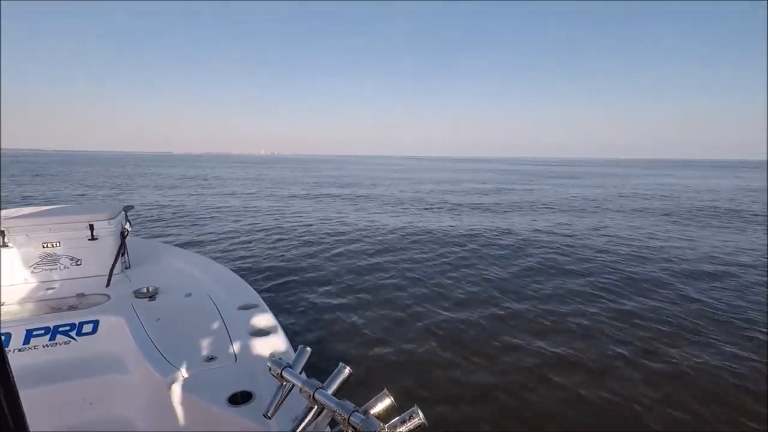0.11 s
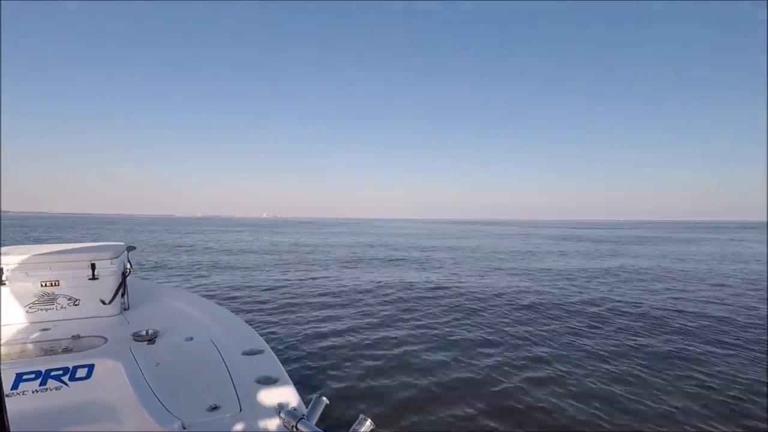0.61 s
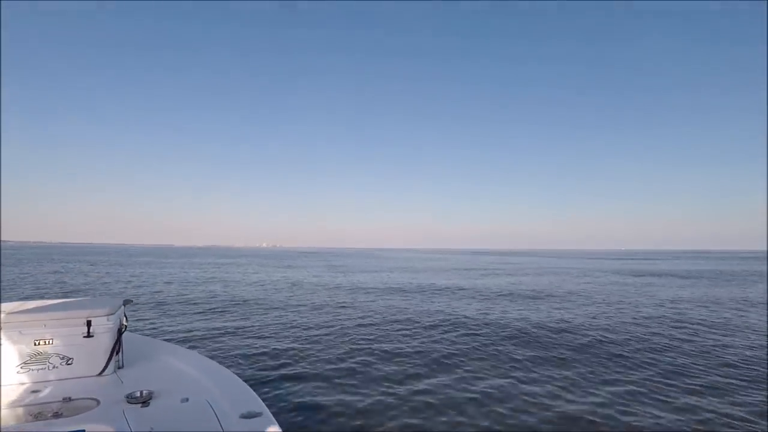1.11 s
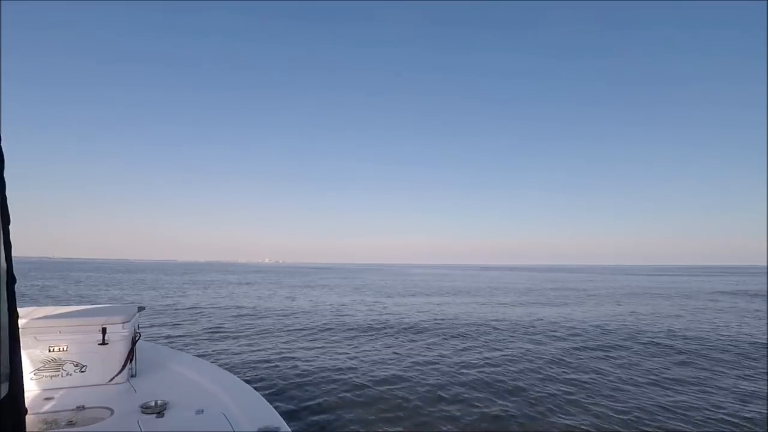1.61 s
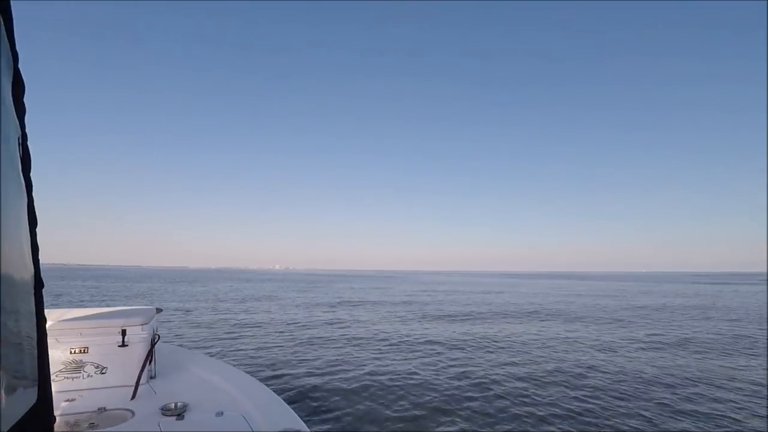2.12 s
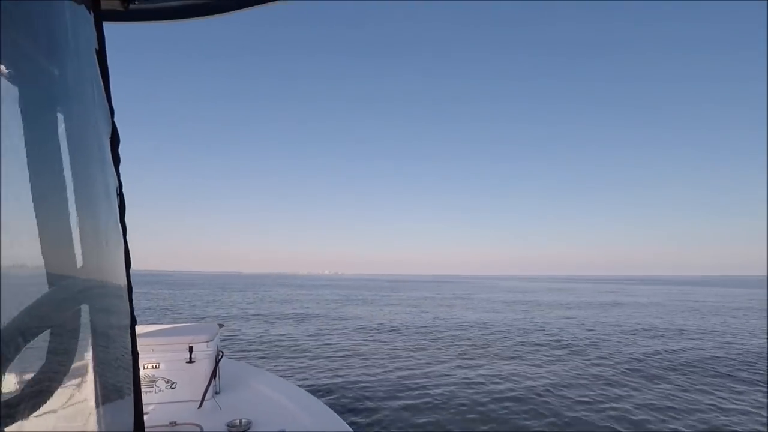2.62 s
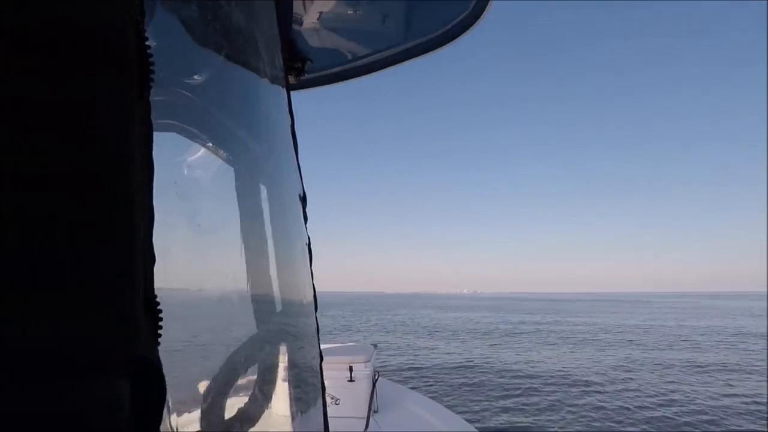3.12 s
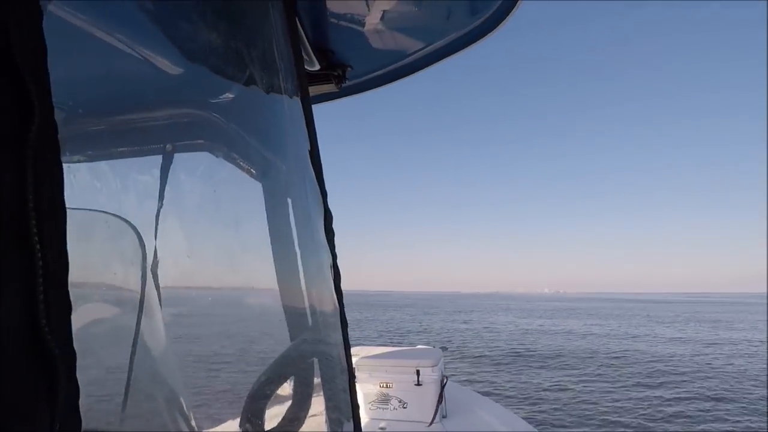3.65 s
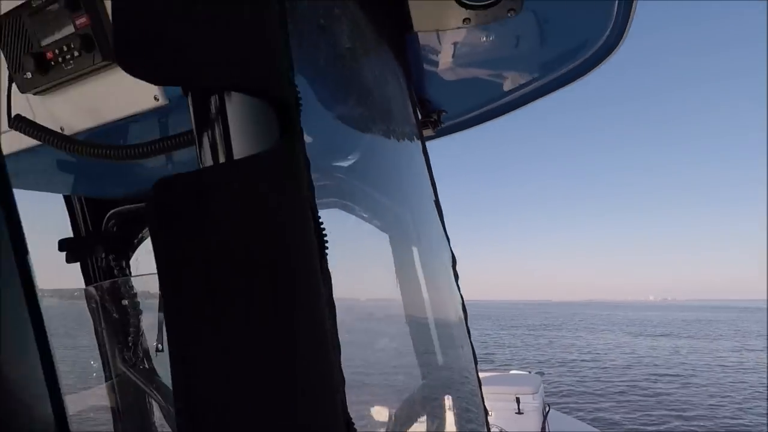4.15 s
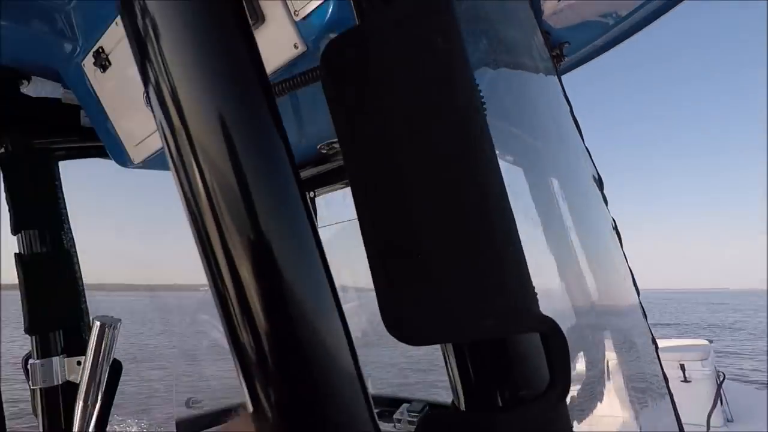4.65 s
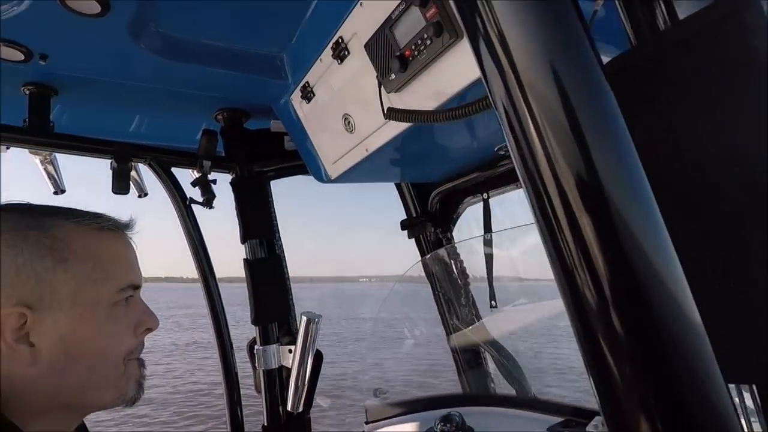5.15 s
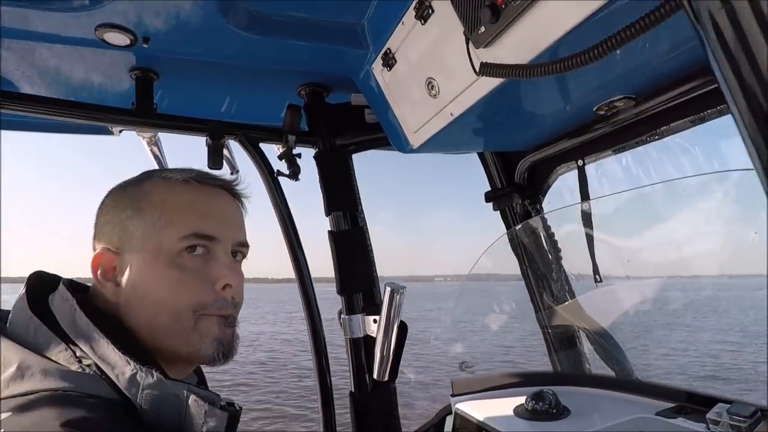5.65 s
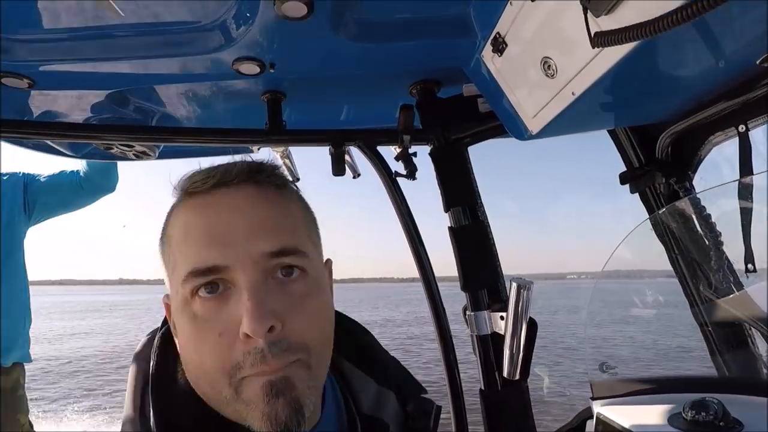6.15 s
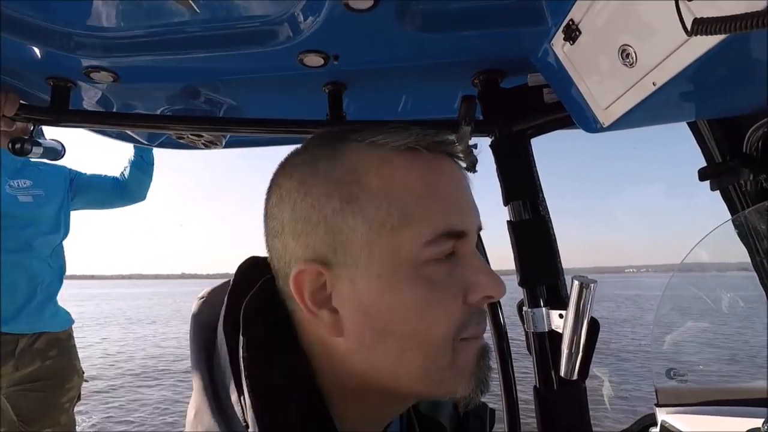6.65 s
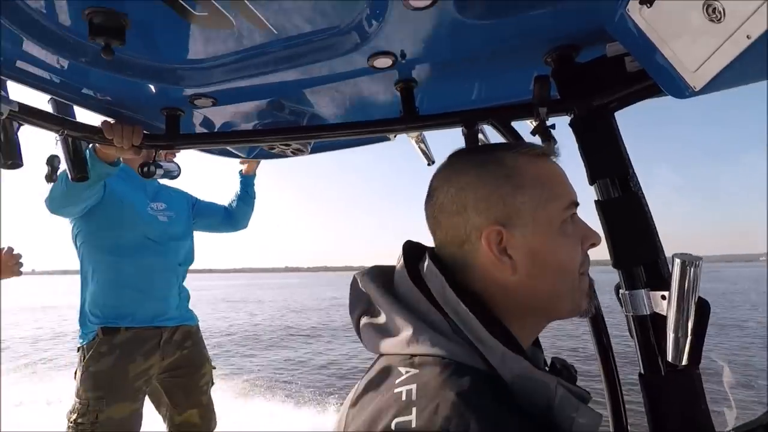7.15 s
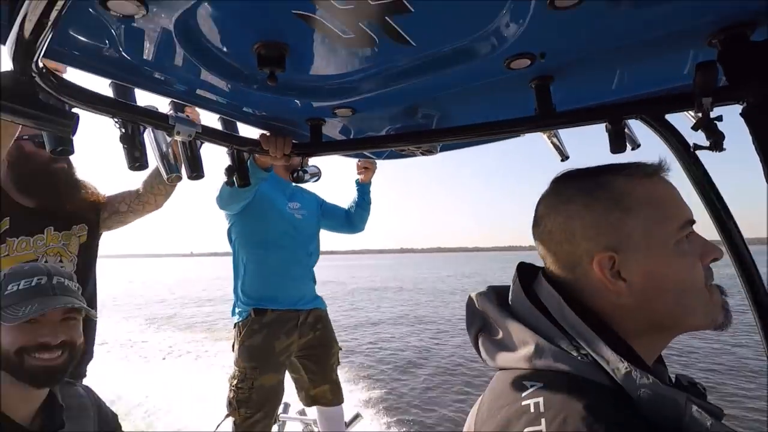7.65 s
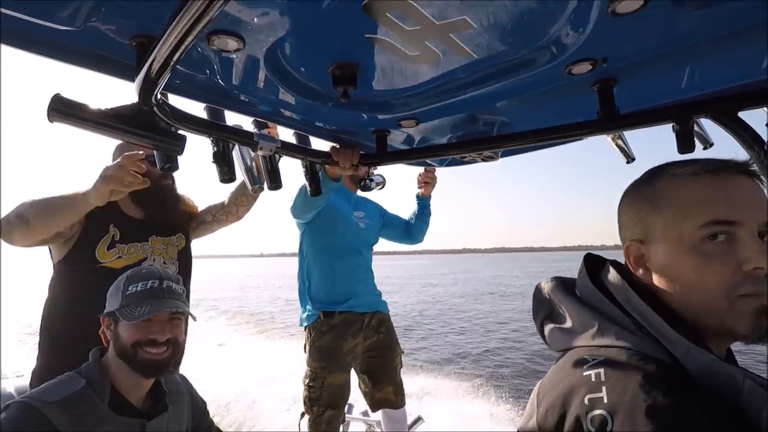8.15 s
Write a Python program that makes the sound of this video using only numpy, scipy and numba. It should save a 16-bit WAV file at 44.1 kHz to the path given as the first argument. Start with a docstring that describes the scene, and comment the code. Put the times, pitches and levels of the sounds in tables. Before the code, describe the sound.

Outdoors on a speeding boat, an exposed microphone catches deep wind throb throughout. Early on, bright spray rises and falls over a steady outboard drone and a pulsing hull hum, with a few tiny chirping drops. Around the middle come abrupt wind slaps and short gaps, then a hard fluttering gust, settling into thick low rumble with little spray left.

```python
"""Wind and spray on a fast motor boat

A small camera pans from the bow to the stern of a motor boat running fast over open water.
Wind is resonant and shaped noise that buffets the microphone port; damped swings thump as it turns past
the windscreen edge. Spray is shaped noise hissing along the hull, with chirping drops close by; an outboard
engine drones underneath as a sum of tones, the hull hums early on, and gain control rides the gusts."""
import sys
import numpy as np
from scipy import signal
from scipy.fft import rfft, irfft, next_fast_len
from scipy.io import wavfile
from scipy.ndimage import uniform_filter1d
from numba import njit

SR = 44100
rng = np.random.default_rng(int(sys.argv[2]) if len(sys.argv) > 2 else 0)


def voltage_ratio(level):
    """Linear amplitude factor for a level in decibels (scalar or array-like)."""
    return 10 ** (np.asarray(level, float) / 20)


def transcribe(u):
    """Save the signal u as a 16-bit wav file named by the first command-line argument.

    u: samples, shape (n,) or (channels, n), limited to [-1, 1]; the rate is SR.
    q: integer samples, one column per channel.
    """
    v = np.clip(np.atleast_2d(u).T, -1, 1)
    q = np.round(v * 32767).astype(np.int16)
    wavfile.write(sys.argv[1], SR, q)


N = 364707  # length in samples

# Source levels below are those ahead of the gain control.
# Drone as the camera turns. Each row: time in seconds, level in dB.
DRONE_LEVEL = [(0, -25), (1.5, -20.5), (2.3, -19), (3.5, -26), (4.2, -28.5), (5, -38), (8.27, -32)]
# Partials of the drone as ratios to the shaft frequency; 5.23 is the octave of the hull hum,
# the others are engine orders.
DRONE_RATIOS = [4, 5.23, 6, 7, 8, 9, 11, 13, 15, 16, 17, 25]
# Relative level in dB of each of those partials.
PARTIAL_LEVELS = [0, -2.5, -4.5, -0.5, -6, -5.5, -13.5, -17.5, -20.5, -24.5, -28.5, -30.5]
# Low hum of the hull. Each row: time in seconds, level in dB.
HULL_HUM = [(0.0, -17), (0.4, -18), (0.75, -11.5), (1.0, -15), (1.2, -23.5), (1.45, -12), (1.75, -13),
            (1.95, -24.5), (2.6, -24.5), (3.0, -45.5)]
# Drops of spray landing close by. Each row: start in seconds, level in dB, start pitch in Hz,
# end pitch in Hz, length in seconds.
SPRAY_DROPS = [(2.233, -35, 4140, 4650, 0.0051), (2.247, -30.5, 4030, 6440, 0.046),
               (2.737, -39, 4400, 5140, 0.0056), (3.139, -28.5, 4500, 6500, 0.0049)]
# Spray swells with each wave, then fades as the camera turns inboard. Each row: time in seconds,
# hiss level in dB, wash level in dB, splash against hiss in dB.
SPRAY_SWELL = [(0.0, -39.5, -39.5, -9), (0.15, -38.5, -41.5, -4), (0.46, -30.5, -34.5, -6.5),
               (0.7, -28, -36, -8), (0.93, -32, -41, -7), (1.23, -36.5, -43, -6.5),
               (1.62, -29, -37.5, -8.5), (1.98, -31, -41, -8.5), (2.17, -35, -44.5, -8),
               (2.37, -33.5, -42, -8), (2.5, -38.5, -45, -5), (2.87, -35.5, -41.5, -9),
               (3.17, -46, -49, -7.5), (3.7, -42, -42.5, -6.5), (4.3, -45, -40, -6),
               (4.73, -49.5, -47, -8.5), (5.0, -47.5, -44, -17), (5.35, -47.5, -46, -5.5),
               (6.6, -51, -50, -4.5), (8.27, -49.5, -47, -2)]
# The top treble of the spray is stronger mid-turn. Each row: time in seconds, change in dB.
FIZZ_CHANGE = [(2.5, -2), (3.2, 0), (4.0, 0), (4.5, -1), (8.27, -1)]
# Spectra of the four spray ranges. Each row: frequency in Hz, relative level in dB.
WASH_SPECTRUM = [(1050, -22), (1200, 3.5), (1400, 5), (1700, 2), (2700, -3.5), (3300, -6), (4200, -14.5)]
SPLASH_SPECTRUM = [(2600, -20.5), (3300, -6.5), (3900, 0), (4800, -1), (5800, -17)]
HISS_SPECTRUM = [(4200, -26.5), (5200, -4), (6900, 1), (8400, -5), (9500, -17.5), (10800, -24),
                 (12000, -46.5)]
FIZZ_SPECTRUM = [(6180, -53.5), (10500, -17), (11100, 0), (12500, 8), (14600, 0), (15100, -1)]
# Single eddies slapping the port. Each row: start in seconds, swing level in dB, pitch in Hz,
# crack level in dB, length of the swing in cycles.
EDDY_THUMPS = [(2.903, -2, 206, -43.5, 0.45), (2.915, -6, 193, -49, 0.53), (2.963, 0, 159, -43, 0.67),
               (3.075, -4, 230, -58, 0.52), (3.106, -1, 147, -54, .4), (3.131, -5, 286, -47, 1.03),
               (3.24, -4, 200, -55, 0.81), (3.747, -8.5, 228, -47, 0.7), (3.918, -4, 298, -35.5, 1.03),
               (3.99, -1, 147, -55, 0.43), (4.247, 5.5, 277, -38.5, 0.7), (4.27, 2, 228, -36, 0.94),
               (4.328, 4, 195, -33, 0.42), (4.341, -0.5, 205, -35.5, 0.65), (4.396, 5.5, 184, -35.5, 0.7),
               (4.433, 5.5, 282, -44.5, 0.64), (4.46, -1.5, 301, -39, 1.16), (4.698, -2.5, 222, -41, 0.47)]
# The level of the wind dips briefly. Each row: centre in seconds, length in seconds, depth in dB.
LEVEL_DIPS = [(0.102, .05, -0.5), (2.704, 0.054, -11), (3.005, 0.054, -21), (3.803, 0.035, -8),
              (3.968, .03, -19), (4.044, 0.066, -8), (5.858, 0.038, -6.5), (6.047, .07, -6.5),
              (6.507, 0.016, -17), (8.085, 0.11, -5.5)]
# Wind on the port as the camera turns. Each row: time in seconds, slow heave in dB, buffet in dB,
# buffet centre in Hz, flutter in dB, rasp in dB.
WIND_COURSE = [(0.0, -17, -18.5, 97, -19.5, -48), (0.45, -14, -17.5, 95.3, -22, -37),
               (1.1, -13.5, -18, 99.8, -19, -45), (1.6, -16, -15, 97, -18, -39.5),
               (2.3, -11, -15.5, 93.4, -23, -47.5), (2.85, -10.5, -13.5, 89, -20, -43),
               (3.15, -10.5, -22.5, 87, -34.5, -51), (3.7, -10, -16.5, 74.6, -22, -44.5),
               (4.1, -6, -21.5, 83.7, -29, -48), (4.35, -11.5, -13, 98.7, -19.5, -34.5),
               (4.65, -11, -17.5, 92.4, -23, -46.5), (4.95, -12, -9.5, 118, -13.5, -35),
               (5.6, -9, -8.5, 98.8, -6, -32.5), (5.76, -14, -13, 107, -16.5, -44),
               (6.3, -18, -10, 99.4, -18, -57.5), (7.1, -16, -11, 100, -16, -54),
               (7.8, -14, -11, 106.6, -11, -47), (8.27, -14.5, -11, 102.4, -12.5, -51)]
# Spectra of the small eddies: flutter, rasp and the lower edge of the rasp.
# Each row: frequency in Hz, relative level in dB.
FLUTTER_SPECTRUM = [(90, -25.5), (140, -0.5), (237, -3), (320, -7.5), (410, -19), (450, -38), (520, -50.5),
                    (560, -71)]
RASP_SPECTRUM = [(520, -10), (600, 2), (630, -10.5), (760, -1.5), (870, -3), (990, -5.5), (1090, -14.5)]
EDGE_SPECTRUM = [(300, 0.5), (380, 1), (430, -4), (510, -15.5), (560, -37.5)]


def unit(x):
    """Normalisation: divides a signal by its root mean square."""
    return x / np.sqrt(np.mean(x ** 2))


def columns(table):
    """Linear interpolation: each column of a (seconds, value, ..) table as one value per sample."""
    seconds, *rest = np.transpose(table)
    return [np.interp(np.arange(N) / SR, seconds, column) for column in rest]


def coloured(spectrum):
    """Spectral shaping: white noise weighted by (Hz, dB) points, at rms 1."""
    size = next_fast_len(N)
    hz, db = np.transpose(spectrum)
    bins_hz = np.arange(size // 2 + 1) * SR / size
    gain = voltage_ratio(np.interp(np.log(bins_hz + 1), np.log(hz), db, -120, -120))
    return unit(irfft(rfft(rng.standard_normal(size)) * gain, size)[:N])


def walk(rate):
    """Slow random modulation: values held for 1 / rate seconds, smoothed twice, at rms 1."""
    hold = int(SR / rate)
    steps = np.repeat(rng.standard_normal(N // hold + 1), hold)
    return unit(uniform_filter1d(uniform_filter1d(steps, hold), hold)[:N])


@njit
def band(x, hz, k):
    """Resonance: a state-variable band-pass with a moving centre; k is width over centre."""
    y, b, l = np.empty(len(x)), 0., 0.
    for i in range(len(x)):
        g = np.tan(np.pi * hz[i] / SR)
        v = (b + g * (x[i] - l)) / (1 + g * (g + k))
        b, l, y[i] = 2 * v - b, l + 2 * g * v, k * v
    return y


@njit
def follow(x, attack, release):
    """Envelope detection: the level rises fast and falls slowly, by a share of the gap per sample."""
    e, y = .2, np.empty(len(x))
    for i in range(len(x)):
        e += (abs(x[i]) - e) * (attack if abs(x[i]) > e else release)
        y[i] = e
    return y


def twice(hz, share):
    """Cascaded resonance: white noise through the same band-pass twice, at rms 1."""
    return unit(band(band(rng.standard_normal(N), hz, share), hz, share))


def drone():
    """Additive synthesis: engine orders and the octave of the hull hum, each wavering a little in level."""
    shaft_hz, waver_db = 31.95, 1.5
    turns = 2 * np.pi * shaft_hz * np.cumsum(1 + .001 * walk(3.)) / SR
    tones = np.zeros(N)
    for ratio, db in zip(DRONE_RATIOS, PARTIAL_LEVELS):
        start_phase = 2 * np.pi * rng.random()
        tones += voltage_ratio(db + waver_db * walk(5.9)) * np.sin(ratio * turns + start_phase)
    return voltage_ratio(columns(DRONE_LEVEL)[0]) * unit(tones)


def hull_hum():
    """Slow modulation of a tone: a low hum from the hull swells and fades with a slight drift in pitch."""
    centre_hz = 83.5
    drift, waver_db = .006 * walk(11.), 1.5 * walk(11.5)
    phase = 2 * np.pi * np.cumsum(centre_hz * (1 + drift)) / SR
    return np.sqrt(2) * voltage_ratio(columns(HULL_HUM)[0] + waver_db) * np.sin(phase)


def drops():
    """Gliding resonance: each drop is a short noisy chirp whose centre frequency rises."""
    out = np.zeros(N)
    for start, db, start_hz, end_hz, length in SPRAY_DROPS:
        i, size = int(start * SR), max(int(length * SR), 16)
        glide = np.linspace(start_hz, end_hz, size)
        chirp = band(band(rng.standard_normal(size), glide, 0.38), glide, 0.38)
        out[i:i + size] += voltage_ratio(db) * np.hanning(size) * unit(chirp)
    return out


def spray():
    """Broadband noise of water torn up by the hull: four ranges swell together and flicker alone."""
    hiss_db, wash_db, splash_db = columns(SPRAY_SWELL)
    fizz_db = hiss_db - 18.5 + columns(FIZZ_CHANGE)[0]
    ranges = ((hiss_db, HISS_SPECTRUM), (wash_db, WASH_SPECTRUM),
              (hiss_db + splash_db, SPLASH_SPECTRUM), (fizz_db, FIZZ_SPECTRUM))
    common_swell = voltage_ratio(0.7 * walk(11.0))
    return common_swell * sum(voltage_ratio(db + 0.18 * walk(14.)) * coloured(colour) for db, colour in ranges)


def thumps():
    """Impulsive response: each slap swings the diaphragm over a slower push, with a brief noisy crack."""
    out = np.zeros(N)
    t = np.arange(int(.05 * SR)) / SR
    rise = np.sin(np.pi / 2 * np.minimum(t / .002, 1)) ** 2  # 2 ms onset
    rattle = 2.94 * t / 0.003 * np.exp(-t / 0.0053)
    crack = twice(np.full(N, 1250.), 1.07)
    for start, db, hz, crack_db, cycles in EDDY_THUMPS:
        i = int(start * SR)
        turn = t * hz - 1.465 * cycles  # cycles from the middle of the swing
        swing = np.exp(-(turn / cycles) ** 2) * np.cos(2 * np.pi * turn - .8)
        late = turn - .6
        push = 1.1 * np.exp(-(late / 0.78) ** 2) * np.sin(2 * np.pi * 0.36 * late)
        out[i:i + len(t)] += voltage_ratio(db) * rise * (swing - push)
        out[i:i + len(t)] += voltage_ratio(crack_db) * rattle * crack[i:i + len(t)]
    return out


def level_dips():
    """Amplitude modulation: the sum in dB of smooth bell-shaped dips."""
    t = np.arange(N) / SR
    return sum(db * np.exp(-((t - s) / (length / 2)) ** 2) for s, length, db in LEVEL_DIPS)


def wind():
    """Turbulence: large eddies heave and buffet in gusts; small ones flutter and rasp in shared quick bursts."""
    heave_db, buffet_db, centre_hz, flutter_db, rasp_db = columns(WIND_COURSE)
    gusts_per_s, heave_gust_db, buffet_gust_db = 11., 1.5, 2
    bursts = walk(45.)

    heave_hz = 0.39 * centre_hz
    heave = voltage_ratio(heave_db + heave_gust_db * walk(gusts_per_s)) * twice(heave_hz, 1.295)

    centre_hz = centre_hz * np.exp(0.047 * walk(gusts_per_s))
    upper_share = (centre_hz / 135) ** 2.5  # quicker buffets add more of a higher lobe
    lobes = unit(twice(centre_hz, 0.53) + upper_share * twice(1.749 * centre_hz, 0.3))
    buffet = voltage_ratio(buffet_db + buffet_gust_db * walk(gusts_per_s) + 1.1 * bursts) * lobes

    flutter = voltage_ratio(flutter_db + 2.5 * bursts + 1.57 * walk(25.)) * coloured(FLUTTER_SPECTRUM)

    flicker_db = 1.4 * walk(30.)
    rasp_noise = coloured(RASP_SPECTRUM) + voltage_ratio(7.5) * coloured(EDGE_SPECTRUM)
    rasp = voltage_ratio(rasp_db + 0.38 * bursts + flicker_db) * rasp_noise
    return voltage_ratio(level_dips()) * (heave + buffet + flutter) + rasp  # the dips leave the rasp alone


def scene():
    """Superposition: the pressures of all sources add at one microphone."""
    return (drone() + hull_hum() + drops() + spray() + thumps() + wind())[None]


def top_cut(x):
    """Nothing passes above the cut-off."""
    return signal.sosfilt(signal.butter(12, 15260, fs=SR, output="sos"), x)


def record(dry):
    """Dynamic compression: gain control ducks bass and treble alike, and peaks are rounded in the bass only."""
    envelope = follow(dry[0], 1 / (0.0038 * SR), 1 / (.07 * SR))  # 3.8 ms attack, 70 ms release
    # smoothed over 2.5 ms and scaled by 0.0025 / 0.0036
    level = signal.lfilter([1 / (0.0036 * SR)], [1, 1 / (0.0025 * SR) - 1], envelope)
    # above the threshold of 0.35 the gain falls by half the rise in dB
    gain = voltage_ratio(1.0) * (0.25 / np.maximum(level, .35)) ** .5
    ducked = gain * dry

    split_hz, treble_hz, ceiling = 508, 610, .8
    rounded = ceiling * np.tanh(ducked / ceiling)
    low_pass = signal.ellip(7, .5, 55, split_hz, fs=SR, output="sos")
    high_pass = signal.ellip(8, .5, 55, treble_hz, "high", fs=SR, output="sos")
    bass = signal.sosfilt(low_pass, rounded)
    treble = signal.sosfilt(high_pass, ducked)
    # a notch at 1115 Hz from the camera's wind-noise filtering
    treble = treble - 0.5 * band(treble[0], np.full(N, 1115.), 0.2)
    # a narrow band partly fills the gap between bass and treble
    between = voltage_ratio(-8.5) * band(ducked[0], np.full(N, 562.), .14)
    return top_cut(bass + treble + between)


dry = scene()
out = record(dry)
transcribe(out)
```